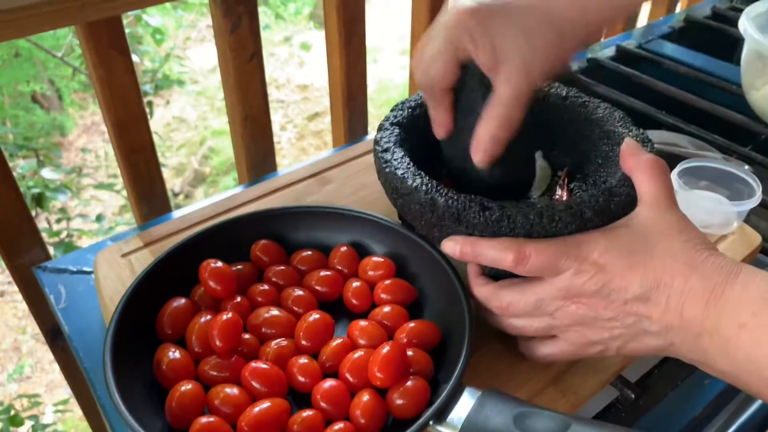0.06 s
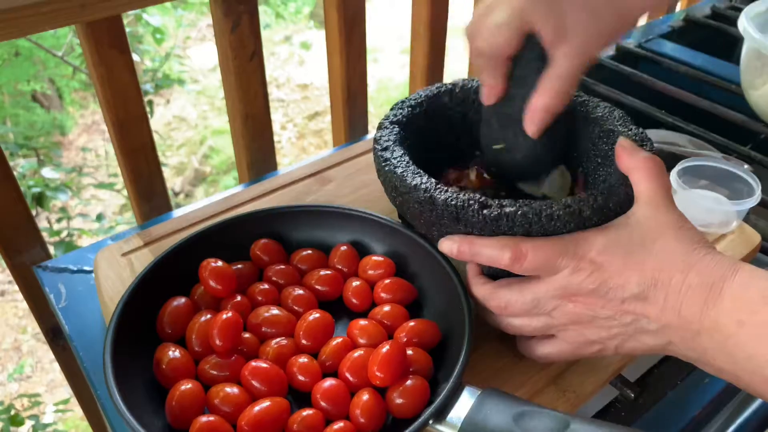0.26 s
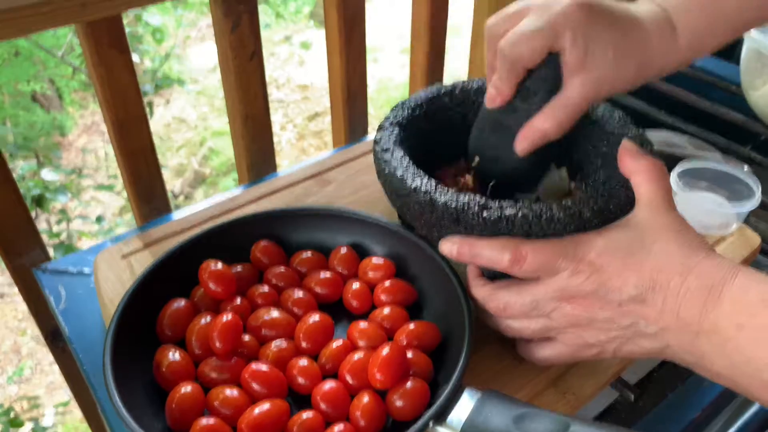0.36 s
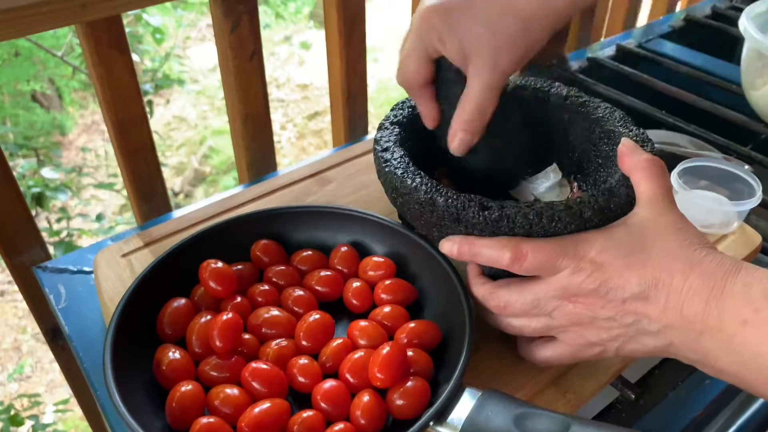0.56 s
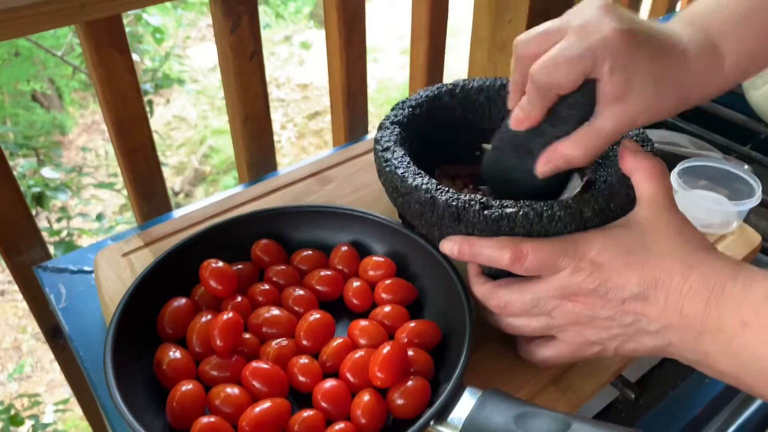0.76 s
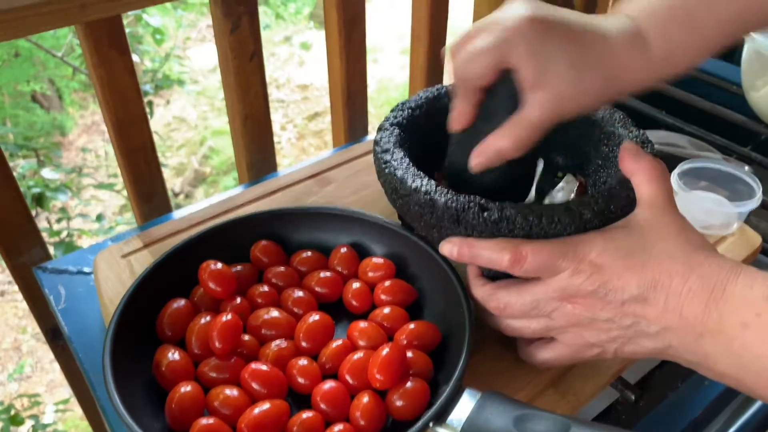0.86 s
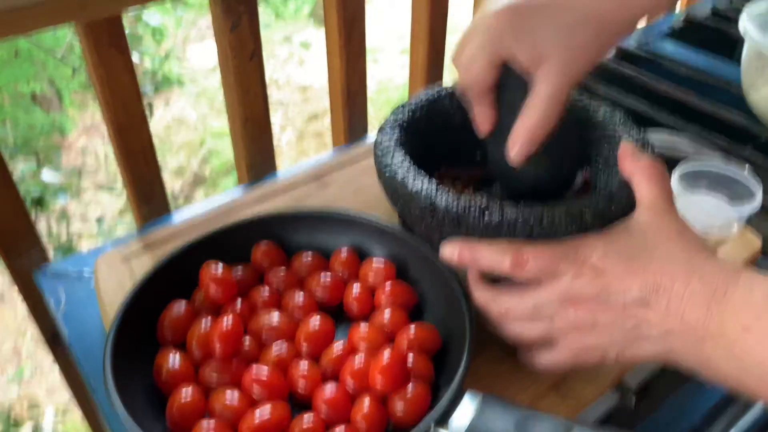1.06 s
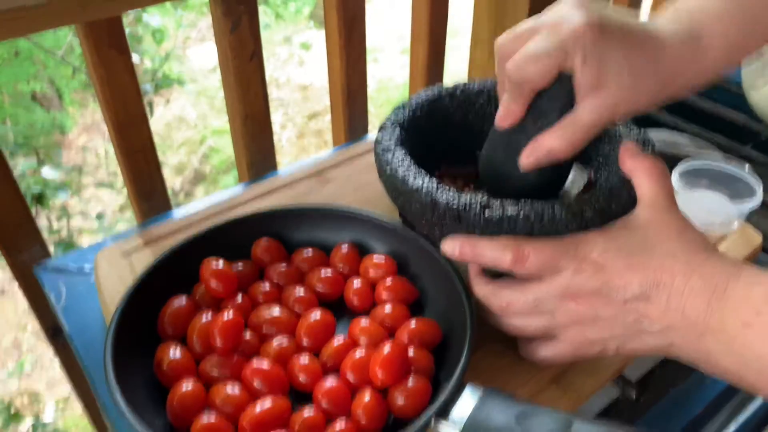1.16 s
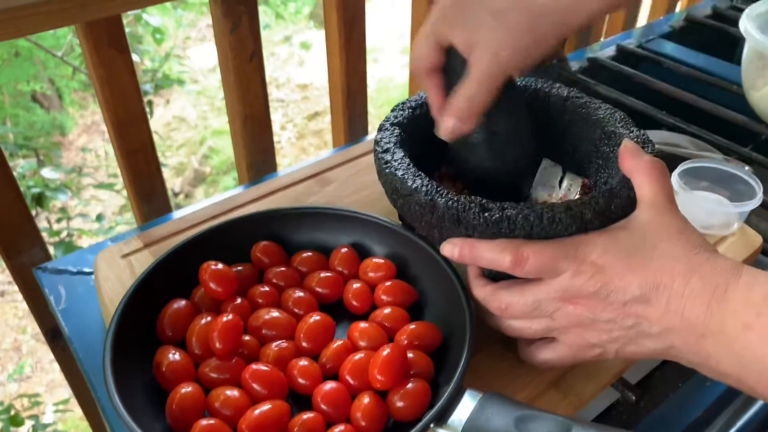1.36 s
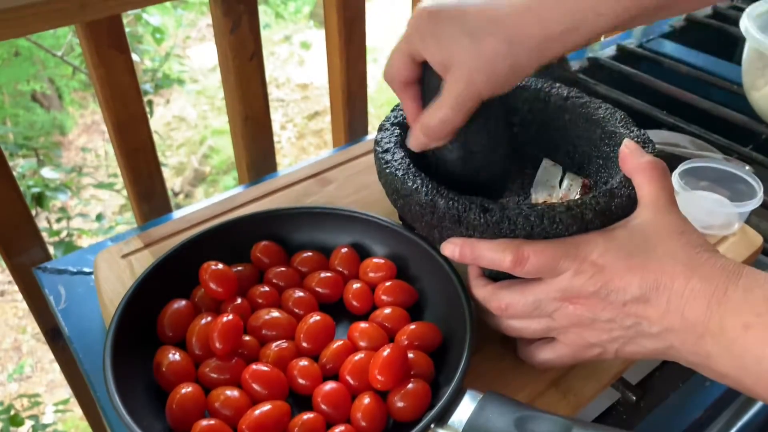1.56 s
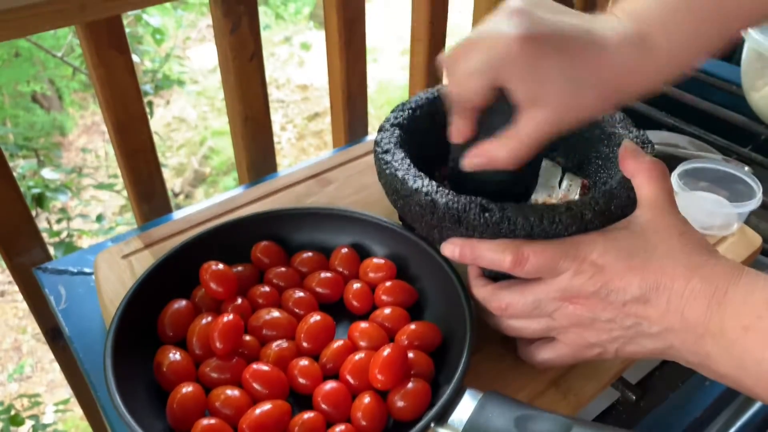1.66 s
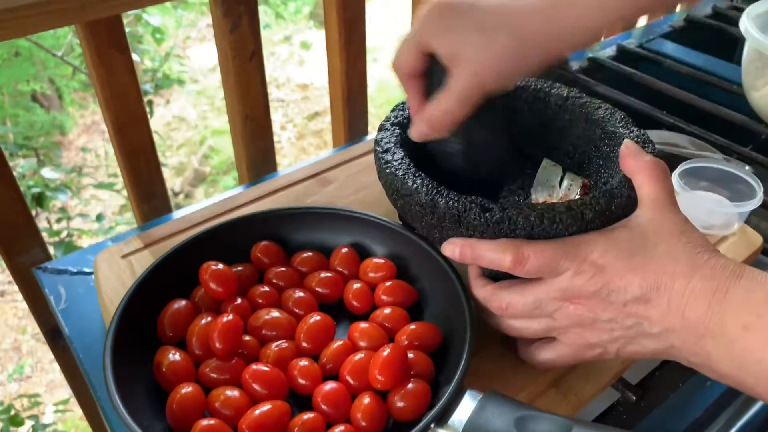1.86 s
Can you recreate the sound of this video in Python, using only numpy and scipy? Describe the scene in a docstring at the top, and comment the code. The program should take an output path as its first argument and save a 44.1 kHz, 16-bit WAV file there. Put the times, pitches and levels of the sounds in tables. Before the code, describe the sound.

Close up on an open porch, a pestle knocks hard in a heavy stone mortar. Gritty grinding and the crackle of dry skins follow, with a second, softer knock near the end and faint outdoor air behind.

```python
"""A stone pestle knocks and grinds dried chiles in a heavy stone mortar, close by on an open porch.
Each blow rings the stone and, a moment later, the bowl and the wooden board under it.
Dry skins crunch and snap under the pestle, and the porch throws back short reflections.
Far off are an outdoor rumble and a faint insect. The microphone's two ports hear the treble
at different phases."""
import sys
import numpy as np
from scipy import signal
from scipy.fft import rfft, irfft, next_fast_len
from scipy.io import wavfile
from scipy.ndimage import uniform_filter1d

SR = 44100
rng = np.random.default_rng(int(sys.argv[2]) if len(sys.argv) > 2 else 0)


def transcribe(u):
    """Save the signal u as a 16-bit wav file named by the first command-line argument.

    u: samples, shape (n,) or (channels, n), limited to [-1, 1]; the rate is SR.
    q: integer samples, one column per channel.
    """
    v = np.clip(np.atleast_2d(u).T, -1, 1)
    q = np.round(v * 32767).astype(np.int16)
    wavfile.write(sys.argv[1], SR, q)


N = 83790

# Pestle blows, close to the microphone. Each row: start in seconds, peak levels of stone, bowl and
# board in dB, rattle length in seconds, dulling of the stone in dB per octave.
BLOWS = [(.2015, -1.5, -23, -22, .0006, 0), (.236, -34, -36, -38, .006, 6), (.263, -40, -50, -50, .006, 3),
         (.366, -48, -42, -37, .008, 20), (.425, -44, -37, -46, .018, 24), (.629, -40, -40, -28, .025, 14),
         (.655, -48, -42, -35, .03, 30), (.685, -34, -34, -44, .015, 12), (.708, -42, -42, -44, .03, 22),
         (.812, -39, -48, -46, .022, 22), (.859, -43, -48, -50, .006, 22), (1.07, -46, -54, -56, .004, 5),
         (1.107, -33, -44, -44, .005, 14), (1.2, -45, -44, -48, .028, 24),
         (1.4765, -21, -27, -24, .008, 14), (1.492, -36, -38, -35, .018, 14),
         (1.668, -45, -52, -54, .005, 26), (1.70, -47, -48, -54, .028, 18), (1.77, -46, -54, -56, .004, 36),
         (1.834, -46, -52, -56, .004, 36)]
# The stone's ring, the bowl's lower tones and the board beneath.
# Each row: frequency in Hz, level in dB, time to fade by 60 dB in seconds.
STONE_MODES = [(1380, -18, .04), (1845, -17, .045), (2075, -7, .045), (2305, -25, .04), (2120, 0, .011),
               (2820, -8, .011), (2068, -29, .17), (1520, -18, .03), (3200, -14, .011), (4850, -25, .03),
               (3900, -29, .014)]
BOWL_MODES = [(655, -3, .06), (905, 0, .085), (1020, -4, .05), (1095, -1, .05)]
BOARD_MODES = [(150, -6, .08), (225, -1, .09), (335, -1, .11), (455, -2, .06), (545, 0, .06)]
# Grit on stone, in the blows and the crunch. Each row: frequency in Hz, level in dB.
GRIT_SPECTRUM = [(500, -8), (1500, 6.5), (3000, -5), (4600, -6), (6000, -14.5), (9000, -25)]
BOWL_LATE_S, BOARD_LATE_S, SHORTEST_T60_S = .0025, .0035, .011
CONTACT_S, SOFTEN_PER_DB, RATTLE_DB = 4.5e-5, 1.2e-6, -3
STRIKE_SPREAD_DB, DETUNE = 2, .015

def pestle(size=2048):
    """Each blow is a push and a rattle of small contacts that crack grit and ring stone, bowl and board."""
    out, t = np.zeros(N), np.arange(size) / SR
    hardest_db = max(blow[1] for blow in BLOWS)
    stone_hz, _, stone_t60 = np.array(STONE_MODES).T
    bodies = (STONE_MODES, 0), (BOWL_MODES, BOWL_LATE_S), (BOARD_MODES, BOARD_LATE_S)
    for start, *levels_db, rattle_s, dull_db in BLOWS:
        stone_db = levels_db[0]
        cushioned = stone_db < hardest_db  # weaker blows land on pulp
        noise = rng.standard_normal(size)
        contacts = undb(RATTLE_DB) / 6 * noise ** 3 * np.clip(1 - t / rattle_s, 0, 1) ** .5
        contacts[0] = 1  # the push
        grit = conv(noise[::-1] * decay(t, .025), response(GRIT_SPECTRUM))
        add_at_peak(out, conv(grit, contacts), start, stone_db - (12 if cushioned else 24))
        contact_s = CONTACT_S + SOFTEN_PER_DB * (hardest_db - stone_db)
        pulse_centre = t[48]
        force = conv(contacts, np.exp(-.5 * ((t[:128] - pulse_centre) / contact_s) ** 2))
        scatter = cushioned * rng.standard_normal((3, 16))  # one row a body
        tilts_db = STRIKE_SPREAD_DB * scatter  # each strike point weights the modes differently
        detunes = DETUNE * scatter[:, ::-1]  # pulp and grip shift them a little
        tilts_db[0, :len(stone_hz)] -= dull_db * np.log2(stone_hz / stone_hz[2])
        if cushioned:  # pulp mutes and lowers the stone's short, broad modes
            clack = np.flatnonzero(stone_t60 <= SHORTEST_T60_S)
            tilts_db[0, clack] -= 6
            detunes[0, clack] -= .13
        for (modes, late), db, tilt_db, detune in zip(bodies, levels_db, tilts_db, detunes):
            tone = ring(modes, tilt_db, detune, t60_share=.4 if cushioned else 1)
            add_at_peak(out, signal.fftconvolve(force, tone), start + late - pulse_centre, db)
    return out


def ring(modes, tilt_db, detune, t60_share, swell_cycles=1.1):
    """A struck body's modes swell and die away, successive ones starting in opposite phase."""
    t = np.arange(12000)[:, None] / SR
    hz, db, t60 = np.array(modes, float).T
    hz = hz * (1 + detune[:len(hz)])
    gain = undb(db + tilt_db[:len(hz)]) * (-1.) ** np.arange(len(hz))
    swell = 1 - np.exp(-(t * hz / swell_cycles) ** 2)
    fade = decay(t, np.maximum(t60 * t60_share, SHORTEST_T60_S))
    return (gain * swell * np.sin(2 * np.pi * hz * t) * fade).sum(axis=1)


# Grinding down in the bowl. Each row: time of the peak in seconds, skin level in dB, grit level in dB,
# rise and fall in seconds from and to CRUNCH_EDGE_DB below the peak.
CRUNCHES = [(0.238, -36.5, -36, 0.015, 0.0086), (0.293, -60, -53.5, 0.13, 0.021),
            (0.355, -48.5, -49, 0.059, 0.019), (0.432, -48, -51.5, 0.15, 0.065),
            (0.489, -60.5, -64.5, 0.028, 0.031), (0.591, -57.5, -59, 0.023, 0.014),
            (0.641, -51.5, -47.5, 0.029, 0.11), (0.833, -37, -43, 0.025, 0.014),
            (0.876, -48.5, -51, 0.025, 0.034), (.99, -66, -69, 0.065, 0.087),
            (1.073, -52.5, -51.5, 0.019, 0.029), (1.191, -56, -53.5, 0.11, 0.042),
            (1.265, -64, -72, 0.028, 0.028), (1.508, -55, -50.5, 0.062, 0.038),
            (1.57, -66, -54, 0.039, 0.083), (1.623, -53.5, -55, 0.01, 0.036),
            (1.723, -61.5, -67, 0.077, 0.058)]
# Dry skins breaking, bright at close range. Each row: frequency in Hz, level in dB.
SKIN_SPECTRUM = [(1500, -48.5), (4000, -54), (6500, -3.5), (8500, 6), (10000, 2.5), (12000, -18),
                 (14000, -2.5), (16000, -30)]
CRUNCH_EDGE_DB, GRAINS_PER_S, GRAIN_SPREAD_DB = 21.5, 9000, 2.5

def crunch():
    """Swells of dense, uneven grains: bright breaking skins and duller grit on stone."""
    peak_s, skin_db, grit_db, rise, fall = np.array(CRUNCHES, float).T[:, :, None]
    t = np.arange(N) / SR - peak_s
    swells = undb(-CRUNCH_EDGE_DB * np.where(t < 0, -t / rise, t / fall))
    chance, polarity, strength = rng.random((3, N))
    grains = (chance < GRAINS_PER_S / SR) * np.sign(polarity - .5)
    grains *= undb(-GRAIN_SPREAD_DB * np.log(1 - strength) + 3.5 * flicker(200))
    return sum(unit_rms(conv(grains, response(spectrum))) * (undb(db) * swells).sum(axis=0)
               for spectrum, db in ((SKIN_SPECTRUM, skin_db), (GRIT_SPECTRUM, grit_db)))


# Snaps under the pestle. Each row: start in seconds, peak level in dB.
SNAPS = [(0.235, -39), (0.284, -31.5), (0.3083, -29.5), (0.3963, -30.5), (0.411, -33), (0.4272, -33),
         (0.488, -35.5), (0.829, -36), (1.1857, -38), (1.2288, -39.5), (1.2679, -38), (1.5405, -35),
         (1.5584, -43.5), (1.62, -40.5), (1.718, -41.5)]
# The colour of one snap, close up. Each row: frequency in Hz, level in dB.
SNAP_SPECTRUM = [(1500, -22), (4200, -4), (6000, -8), (9000, 0), (16000, -12)]

def snaps(t60_s=.0035):
    """Brittle seeds and skins crack one at a time, each a tiny burst of noise."""
    out, t = np.zeros(N), np.arange(700) / SR
    for start, db in SNAPS:
        burst = rng.standard_normal(len(t)) * decay(t, t60_s)
        add_at_peak(out, conv(burst, response(SNAP_SPECTRUM)), start, db)
    return out


# What the porch sends back to the microphone. Each row: frequency in Hz, gain in dB.
PORCH_SPECTRUM = [(2300, -12), (3500, 0), (16000, -3)]

def porch(near, t60_s=.08, level_db=-6):
    """Short, bright reflections of the mortar, different on the left and right."""
    t = np.arange(6000) / SR
    tails = rng.standard_normal((2, len(t))) * decay(t, t60_s) * np.clip(t / .003, 0, 1)
    echoes = [conv(unit_rms(tail) / np.sqrt(len(t)), response(PORCH_SPECTRUM)) for tail in tails]
    return undb(level_db) * np.array([conv(near, echo) for echo in echoes])


# The open air beyond the porch. Each row: frequency in Hz, level in dB.
AIR_SPECTRUM = [(25, -20.5), (64, -1), (285, -12), (500, -15.5), (1130, -25), (1650, -28.5), (3520, -34.5),
                (6000, -39.5), (9300, -45), (16000, -74)]

def outdoor_air(level_db=-47, flicker_db=2.5):
    """Distant rumble and hiss, flickering separately in each half-octave band."""
    f = np.arange(N // 2 + 1) * SR / N
    hz, db = np.array(AIR_SPECTRUM, float).T
    shape = undb(np.interp(np.log(f + 1), np.log(hz), db))
    spectrum = rfft(rng.standard_normal((2, N))) * shape
    out, half_octaves = 0, 2 * np.log2(f + 1)
    for band in range(8, 29):
        mid, side = irfft(spectrum * np.clip(1 - np.abs(half_octaves - band), 0, 1), N)
        wide = band < 26  # centred from about 8 kHz up
        out = out + undb(flicker_db * flicker(6)) * stereo(mid, wide * side)
    return undb(level_db) * out / np.sqrt(np.mean(out.mean(axis=0) ** 2))


def insect(hz=9155, width_hz=12, level_db=-78):
    """A thin, wavering trill far off: a very narrow band of noise."""
    band = signal.butter(2, [hz - width_hz / 2, hz + width_hz / 2], "band", fs=SR, output="sos")
    trill = unit_rms(signal.sosfilt(band, rng.standard_normal(N)))
    return trill * undb(level_db + 3 * flicker(8))


def undb(db):
    """Decibels to gain."""
    return 10 ** (np.asarray(db) / 20)


def unit_rms(x):
    """Scale to rms 1."""
    return x / np.sqrt(np.mean(x ** 2))


def decay(t, t60):
    """A fade of 60 dB every t60 seconds."""
    return 1000. ** (-t / t60)


def response(table, size=1024):
    """Causal filter response with the spectrum of (Hz, dB) points."""
    hz, db = np.array(table, float).T
    f = np.maximum(np.arange(size + 1) * SR / (2 * size), 1)
    cepstrum = irfft(np.interp(np.log(f), np.log(hz), db) * np.log(10) / 20)
    cepstrum[1:size] *= 2
    cepstrum[size + 1:] = 0
    return irfft(np.exp(rfft(cepstrum)))[:size]


def conv(x, h):
    """Convolution cut to the length of x."""
    return signal.fftconvolve(x, h)[:len(x)]


def flicker(rate_hz):
    """Random levels, each held for 1 / rate_hz seconds, then smoothed."""
    hold = int(SR / rate_hz)
    steps = np.repeat(rng.standard_normal(N // hold + 1), hold)
    return unit_rms(uniform_filter1d(uniform_filter1d(steps, hold), hold)[:N])


def add_at_peak(out, x, start_s, peak_db):
    """Mix x into out from start_s, scaled to a peak of peak_db."""
    i = int(start_s * SR)
    out[i:i + len(x)] += undb(peak_db) * x[:N - i] / np.abs(x).max()


def stereo(mid, side):
    """Left and right from mid and side."""
    return np.array([mid + side, mid - side])


def scene():
    """The mortar up close, the porch around it, the outdoors behind."""
    near = pestle() + crunch() + snaps()
    return near + porch(near) + outdoor_air() + insect()


# The microphone's two ports. Each row: frequency in Hz, phase lead of the left port in radians.
PORT_PHASES = [(600, 0), (1250, -1.5), (2150, 0), (3700, .8), (4700, 0), (16500, -15.5)]

def record(dry, mono_below_hz=1060, top_hz=15900):
    """The microphone: two ports out of phase in the treble, mono bass and a steep top cut."""
    size = next_fast_len(N + 4096)
    f = np.arange(size // 2 + 1) * SR / size
    lead = np.exp(.5j * np.interp(f, *np.array(PORT_PHASES, float).T))
    left, right = rfft(dry, size) * np.array([lead, 1 / lead])
    side = (left - right) / 2 / np.sqrt(1 + (mono_below_hz / (f + 1)) ** 10)
    both = irfft(stereo((left + right) / 2, side), size)[:, :N]
    return signal.sosfilt(signal.ellip(10, .2, 80, top_hz, fs=SR, output="sos"), both)


dry = scene()
out = record(dry)
transcribe(out)
```